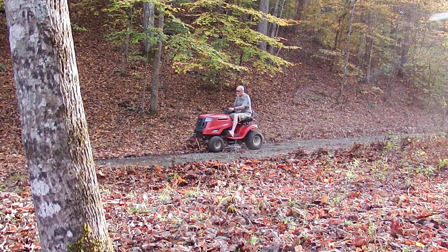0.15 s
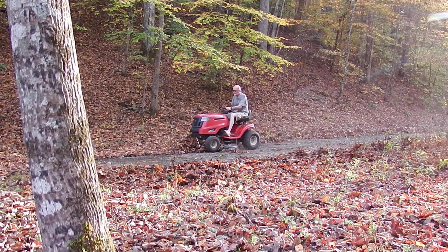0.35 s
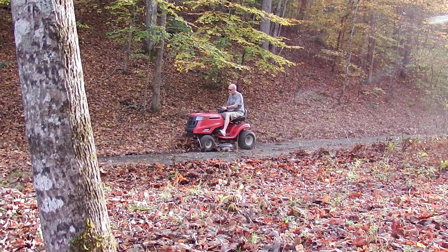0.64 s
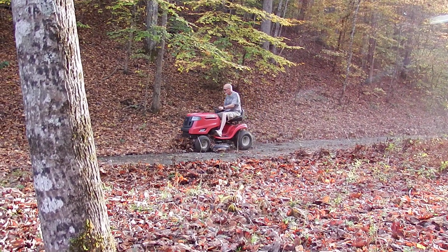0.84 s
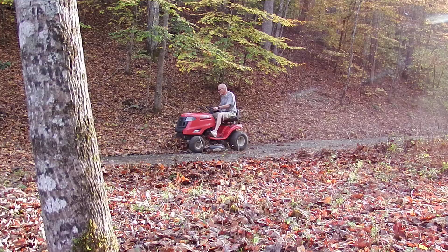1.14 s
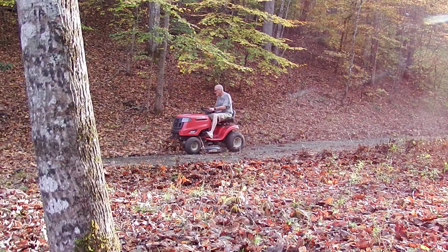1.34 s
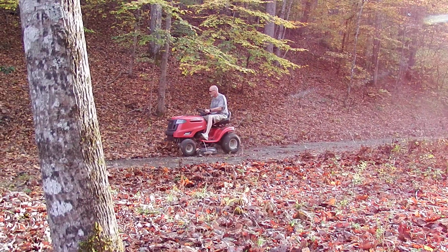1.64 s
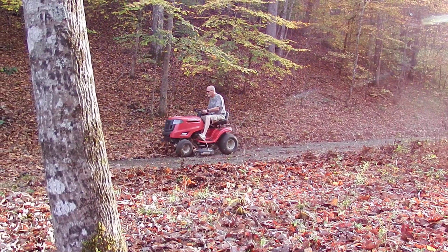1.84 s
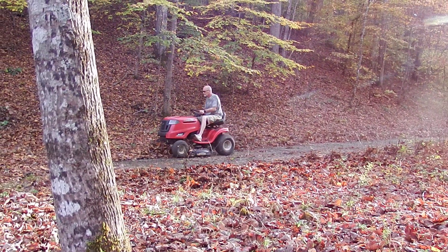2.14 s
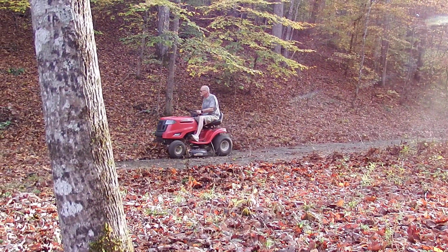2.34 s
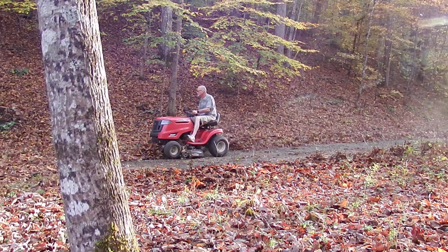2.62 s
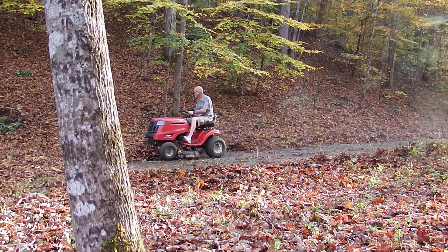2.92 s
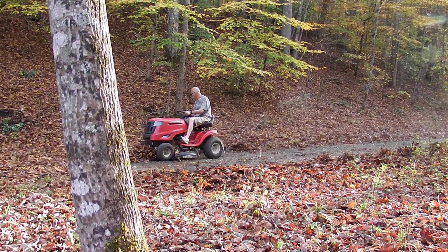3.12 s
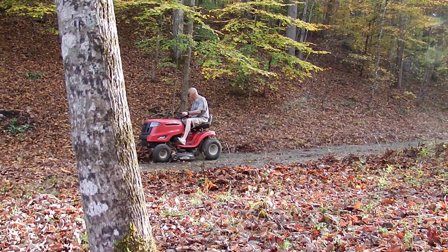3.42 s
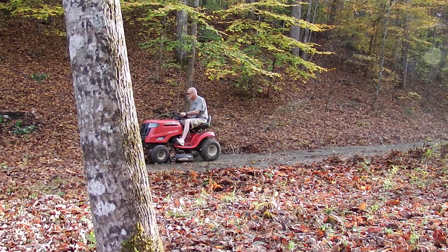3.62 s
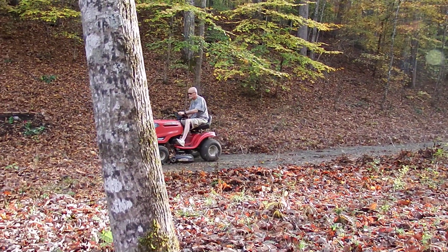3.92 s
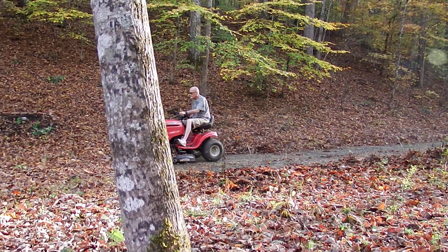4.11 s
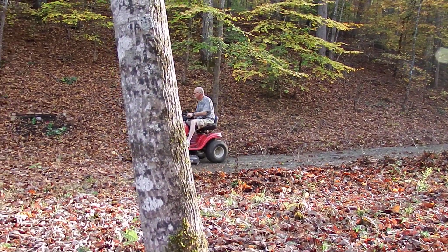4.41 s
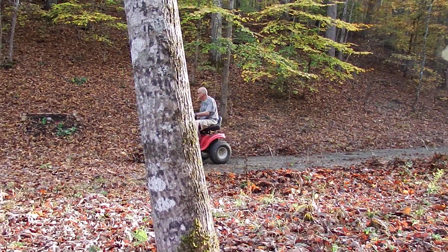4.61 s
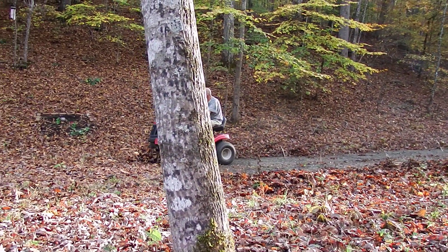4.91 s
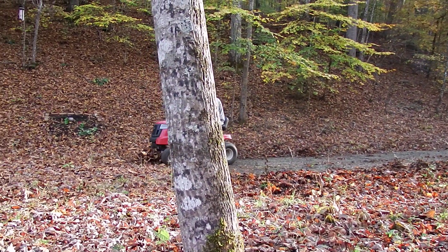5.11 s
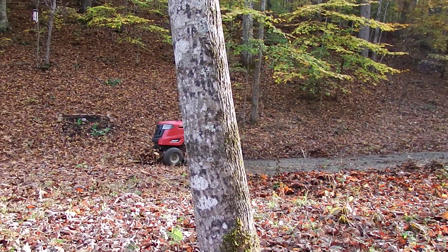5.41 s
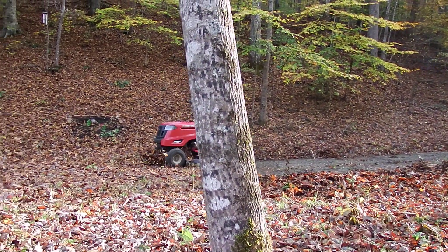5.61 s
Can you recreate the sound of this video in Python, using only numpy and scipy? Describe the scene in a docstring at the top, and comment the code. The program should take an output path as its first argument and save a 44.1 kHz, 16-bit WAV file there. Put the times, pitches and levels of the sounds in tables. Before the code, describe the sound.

Outdoors, a ride-on mower hums steadily while shredding dry fallen leaves in a bright, crackling rush, snapping twigs as it approaches.

```python
"""Riding mower mulching leaves

A riding mower mulches dry leaves on a woodland road, passing at some distance from a two-port microphone.
The engine runs up, then holds its speed but for a few sags; exhaust, blade hum and whine are fluttering tones.
Air under the deck is filtered noise; tearing leaves are clumped noise coloured by the steel deck and its chute.
The deck pings once and twigs crack as short noise bursts; the whole level dips briefly at two moments."""
import sys
import numpy as np
from scipy import signal
from scipy.fft import rfft, irfft, next_fast_len
from scipy.io import wavfile
from scipy.ndimage import uniform_filter1d, minimum_filter1d

SR = 44100
rng = np.random.default_rng(int(sys.argv[2]) if len(sys.argv) > 2 else 0)


def master(y):
    """Save y as 16-bit WAV."""
    cut = np.clip(np.atleast_2d(y).T, -1, 1)
    pcm = np.round(cut * 32767)  # scale
    wavfile.write(sys.argv[1], SR, pcm.astype(np.int16))


N = 253571
TIME = np.arange(N) / SR
PADDED = next_fast_len(N + SR // 10, True)
HZ = np.fft.rfftfreq(PADDED, 1 / SR)

# blade passes per second, before and after the run-up
START_HZ, GOVERNED_HZ = 84.7, 100.9
# the belt ties the engine's firings and the deck's whine to the blade passes
FIRINGS_PER_PASS, WHINE_PER_PASS = 0.2577, 6.085
# the mower is loudest when abreast, and 3 dB down PASSING_S before or after
ABREAST_S, PASSING_S = 5.2, 3.46
# everything on the mower grows louder with speed
RUN_UP_DB_PER_HZ = 0.21
# base levels at governed speed, abreast
DRONE_DB, RUSH_DB, HISS_DB, WHINE_DB = -51.5, -28, -18, -32
# beaming multiplies the distance curve in dB: the even drone changes less, the sideways whine more
DRONE_BEAMING, WHINE_BEAMING = 0.81, 2.36


def gain_of(db):
    """Decibels to amplitude."""
    return 10 ** (np.asarray(db) / 20)


def evened(x):
    """Scales to rms 1."""
    return x / np.sqrt(np.mean(x ** 2) + 1e-20)


def curves(rows):
    """The columns of a time table, joined by straight lines, one value a sample."""
    s, *columns = np.transpose(rows)
    return [np.interp(TIME, s, column) for column in columns]


def read(points):
    """A frequency table at every bin, interpolated over log frequency."""
    f, value = np.transpose(points)
    return np.interp(np.log(HZ + 1), np.log(f + 1), value)


def coloured(x, gain):
    """Filters by a gain at every bin."""
    return irfft(rfft(x, PADDED) * gain, PADDED)[:N]


def noise():
    """White noise."""
    return rng.standard_normal(N)


def wander(rate_hz):
    """Random drift of rms 1, mostly slower than the rate."""
    s = TIME[::32]
    hz = np.fft.rfftfreq(len(s), s[1])
    lowpass = np.exp(-(hz / rate_hz) ** 2) * (hz > 0)
    slow = irfft(rfft(rng.standard_normal(len(s))) * lowpass, len(s))
    return np.interp(TIME, s, evened(slow))


def arch(middle_s, length_s):
    """A smooth swell from 0 to 1 and back."""
    return np.cos(np.pi * np.clip((TIME - middle_s) / length_s, -0.5, 0.5)) ** 2


def below(edge_hz, order=16):
    """Share of the power that lies under an edge."""
    return 1 / (1 + (HZ / edge_hz) ** order)


def resonate(x, hz, width):
    """A resonance of gain 1 that follows the curve hz: shift down to zero, smooth, shift back."""
    turn = np.exp(2j * np.pi * np.cumsum(hz) / SR)
    r = np.exp(-np.pi * width / SR)
    return 2 * (turn * signal.lfilter([1 - r], [1, -r], x / turn)).real


def tone(turns, flutter, flutter_hz):
    """A line whose strength and phase flutter on the way through the wood."""
    angle = (2 * np.pi * ((turns + rng.random()) % 1)).astype("float32")
    in_phase = (1 + flutter * wander(flutter_hz)) * np.cos(angle)
    quadrature = flutter * wander(flutter_hz) * np.sin(angle)
    return evened(in_phase + quadrature)


def speed():
    """Blade passes per second: a smooth run-up, then steady but for sags under load."""
    # sags of the engine under load: (middle [s], length [s], loss [Hz])
    load_sags = [(1.55, 0.63, 2.13), (4.194, 0.46, 1.13), (4.72, 0.45, 0.71)]
    middle_s, scale_s = 0.55, 0.21
    run_up = 1 / (1 + np.exp((middle_s - TIME) / scale_s))
    sag_hz = sum(hz * arch(s, length) for s, length, hz in load_sags)
    return START_HZ + (GOVERNED_HZ - START_HZ) * run_up - sag_hz


def nearness_db():
    """The level follows the distance of a straight, steady pass."""
    return -10 * np.log10(1 + ((TIME - ABREAST_S) / PASSING_S) ** 2)


def mower_db():
    """The level shared by every part of the mower: nearer and faster is louder."""
    return nearness_db() + RUN_UP_DB_PER_HZ * (speed() - GOVERNED_HZ)


def engine(passes):
    """The muffled exhaust: multiples of the firing rate."""
    # exhaust lines: (multiple of the firing rate, level [dB])
    exhaust_lines = [(2, -36), (3, -27), (4, -8), (5, -3), (6, 0), (7, -8), (9, -2), (10, -4.5), (11, 2.5),
                     (12, 4), (14, 5.5), (15, 8.5), (18, 8.5)]
    drone = np.zeros(N)
    for k, db in exhaust_lines:
        drone += gain_of(db) * tone(k * passes * FIRINGS_PER_PASS, flutter=0.2, flutter_hz=13.0)
    return gain_of(DRONE_DB + (DRONE_BEAMING - 1) * nearness_db()) * drone


def blades(passes):
    """Harmonics of two blades that beat slowly, and a rougher whine that beats against the sixth."""
    # blade hum: (harmonic, base level [dB], second blade against the first [dB],
    #             multiple of the distance curve, extra growth with speed [dB/Hz])
    hum_harmonics = [(1, -54, -9, .8, 1.3), (2, -40.3, -6, 1.9, .2), (3, -37, -14, .3, .55),
                     (4, -38.2, -7, 1.8, 0), (5, -43.5, -16, .6, .25)]
    # single harmonics swell or fade for a moment: (harmonic, middle [s], length [s], lift [dB])
    harmonic_swells = [(1, 1.4, .7, -10), (1, 2.42, 1.0, 3), (1, 3.8, 0.56, -3), (2, 1.21, 0.44, 5),
                       (2, 1.54, 0.4, -7), (2, 2.21, 0.5, -4), (3, .25, .25, 12.5), (3, 1.21, .6, 3),
                       (3, 1.7, 0.97, -12), (3, 4.34, 1, -3), (4, 2.175, 0.42, 14), (4, 4.55, 0.35, 8)]
    # the whine swells or fades briefly: (middle [s], length [s], lift [dB])
    whine_lifts = [(1.38, 1, 2.5), (4.11, 0.35, 5), (4.6, 0.2, 8), (4.88, 0.14, 12), (5.52, .25, -8)]
    # one blade slips behind the other on the belt, so their hums beat
    slip_hz, in_step_s = 0.444, 3.024
    lag = 2 * np.pi * slip_hz * (TIME - in_step_s)
    near_db = nearness_db()
    slow_hz = GOVERNED_HZ - speed()
    hum = np.zeros(N)
    for k, db, second_db, beaming, growth in hum_harmonics:
        beat = abs(1 + gain_of(second_db) * np.exp(1j * k * lag))
        swell_db = sum(lift * arch(s, length) for which, s, length, lift in harmonic_swells
                       if round(which) == round(k))
        level_db = db + swell_db + (beaming - 1) * near_db - growth * slow_hz
        hum += gain_of(level_db) * beat * tone(k * passes, flutter=0.083 * k, flutter_hz=5.9)

    swell_db = sum(db * arch(s, length) for s, length, db in whine_lifts)
    whine_db = WHINE_DB + (WHINE_BEAMING - 1) * near_db + swell_db
    sixth_db = -5  # the sixth harmonic against the whine just above it
    sixth = gain_of(sixth_db) * tone(6 * passes, flutter=0.26, flutter_hz=8.8)
    whine = tone(WHINE_PER_PASS * passes, flutter=0.61, flutter_hz=22)
    return hum + gain_of(whine_db) * (sixth + whine)


def air():
    """The turbulent rush under the deck: noise shaped by a fixed spectrum."""
    # air stirred by the blades: (frequency [Hz], relative level [dB per Hz])
    air_spectrum = [(25, -44), (70, -42), (115, -31), (165, -15), (250, -2.5), (380, -3.5), (540, 1),
                    (680, -3.5), (930, -1), (1150, -10.5), (1500, -8), (3000, -58)]
    return gain_of(RUSH_DB) * evened(coloured(noise(), gain_of(read(air_spectrum))))


def deck_colour():
    """The spectrum of tearing leaves, lifted or lowered at each resonance of the steel deck."""
    # leaves being shredded, without the deck: (frequency [Hz], relative level [dB per Hz])
    leaf_spectrum = [(600, -55), (1000, -22.5), (1220, -6), (1700, -6.5), (2300, -3.5), (3100, -5.5),
                     (3900, -3), (4400, -8.5), (5100, -20.5), (5600, -28.5), (6400, -35), (8500, -23.5),
                     (10300, -34), (12500, -40.5), (15700, -56)]
    # resonances of the steel deck: (frequency [Hz], width [Hz], lift [dB])
    deck_modes = [(1177, 67, 3), (1500, 87, 2.5), (1747, 79, 2.5), (1928, 74, 5), (2212, 61, 2.5),
                  (2820, 70, 1), (3310, 100, 3.5), (3538, 70, 5.5), (3800, 89, 2.5), (4100, 79, 5),
                  (4610, 82, -1)]
    lift_db = sum(db / (1 + (2 * (HZ - hz) / width) ** 2) for hz, width, db in deck_modes)
    return gain_of(read(leaf_spectrum) + lift_db)


def shreds(per_s, spread_db):
    """A train of tiny snaps, a few of them much larger than the rest."""
    size = gain_of(spread_db * np.minimum(rng.exponential(1, N), 5))
    return evened(size * rng.choice([-1, 1], N) * (rng.random(N) < per_s / SR))


def crackle(per_s, spread_db, ring_s):
    """Stems break at random: each gives a brief flare, returned as a power of mean 1."""
    size = gain_of(spread_db * np.minimum(rng.exponential(1, N), 3)) * (rng.random(N) < per_s / SR)
    flares = signal.lfilter([1], [1, -np.exp(-1 / (ring_s * SR))], size ** 2)
    return flares / flares.mean()


def chute(x, hz, lift_db, width):
    """The discharge gathers hiss into a moving resonance; a gain partly offsets the lift."""
    return (x + (gain_of(lift_db) - 1) * resonate(x, hz, width)) / gain_of(0.47 * lift_db)


def bounced(x):
    """Short echoes comb the hiss with ripples that slide slowly."""
    # bounces off the road and the bank, shifting as the mower moves:
    # (first delay [s], last delay [s], level [dB])
    echo_paths = [(0.0045, 0.00382, -21), (0.00225, 0.00313, -28), (.0066, .0058, -25),
                  (.0092, .0104, -20.5)]
    echoes = np.zeros(N)
    for first, last, db in echo_paths:
        delay_s = np.linspace(first, last, N)
        echoes += gain_of(db) * np.interp(TIME - delay_s, TIME, x, left=0)
    return x + echoes


def leaves(passes, uneven_db=0.31, uneven_hz=9):
    """Leaves tear in clumps at each blade pass; the deck and its chute colour the hiss."""
    # thicker drifts pass through the deck: (middle [s], length [s], hiss lift [dB], treble lift [dB])
    leaf_drifts = [(0.266, .16, 2, 2.5), (0.837, 1, 4.5, 1.5), (1.42, 0.73, 2.5, 1.5), (1.71, .25, 4, 6),
                   (2.24, 0.76, 1.5, .5), (2.85, 0.77, 2, 2.5), (3.48, 0.096, 1.5, 4.5),
                   (4.47, .33, 3.5, 2), (5.13, 0.92, 2, 0.5)]
    # treble before the drifts, dulling as the mower draws abreast and goes behind a trunk:
    # (time [s], bright hiss [dB], fizz [dB])
    treble_levels = [(0, -23, -41.5), (.55, -22, -42.5), (1.5, -17.5, -40), (1.95, -19.5, -43.5),
                     (2.5, -20, -44), (3.1, -24, -41.5), (3.9, -23.5, -42), (4.7, -24, -48.5),
                     (5.75, -24.5, -48.5)]
    # two bands of the discharge, shifting as the mower drives by:
    # (time [s], lower band [Hz], its lift [dB], upper band [Hz], its lift [dB])
    chute_bands = [(0, 2250, 3, 3630, -4), (1.5, 2460, 7.5, 3720, 7.5), (2.4, 2359, 3, 3666, 9),
                   (3.2, 2330, 4, 3780, 2.5), (3.9, 2160, -0.5, 3740, 2), (4.5, 2070, 7, 3800, 4.5),
                   (5.75, 2280, 6, 3850, 3.5)]
    feed_db = uneven_db * wander(uneven_hz)
    hiss_db = HISS_DB + feed_db + sum(db * arch(s, length) for s, length, db, _ in leaf_drifts)
    crisp_db = feed_db + sum(db * arch(s, length) for s, length, _, db in leaf_drifts)
    bright_db, fizz_db = curves(treble_levels) + crisp_db
    lower_hz, lower_db, upper_hz, upper_db = curves(chute_bands)

    clumps = gain_of(0.58 * wander(31) + 0.23 * wander(320) + 0.18 * np.cos(2 * np.pi * passes))
    stems = crackle(per_s=45, spread_db=6, ring_s=0.0076)
    tearing = clumps * (noise() + 0.42 * shreds(per_s=3000, spread_db=3.0))

    # three bands; the stems stand out most in the highest
    colour, low, high = deck_colour(), below(2730), 1 - below(6200)
    hiss = coloured(tearing * np.sqrt(1 + 0.018 * stems), colour * np.sqrt(low))
    bright = coloured(tearing * np.sqrt(1 + 0.1 * stems), colour * np.sqrt((1 - low) * (1 - high)))
    fizz = coloured(tearing * np.sqrt(1 + 0.62 * stems), colour * np.sqrt(high))
    hiss = bounced(chute(hiss, lower_hz, lower_db, width=320))
    bright = bounced(chute(bright, upper_hz, upper_db, width=130))
    return gain_of(hiss_db) * evened(hiss) + gain_of(bright_db) * evened(bright) + gain_of(fizz_db) * evened(fizz)


def ping(start_s=0.273, rise_s=0.0021):
    """Something hard rings one mode of the deck, quickly damped by the leaves."""
    # the struck mode: frequency [Hz], level [dB], time to fall 60 dB [s]
    hz, db, t60 = (1920, -6, .04)
    age = np.maximum(TIME - start_s, 0)
    return gain_of(db - 60 * age / t60) * (1 - np.exp(-age / rise_s)) * np.sin(2 * np.pi * hz * age)


def twigs(t60_s=0.051, rise_s=0.0019, snap_tilt_db_per_khz=-0.4):
    """Each twig splinters on the blades in a short burst: a crunch in the deck and a snap above it."""
    # twigs hitting the blades: (time [s], crunch [dB], treble snap [dB])
    twig_hits = [(0.3, -13, -36), (0.316, -8.5, -28.5), (.433, -12, -31), (.727, -19, -34),
                 (1.165, -24, -34), (1.29, -9, -29), (1.315, -21, -35), (1.348, -17, -29),
                 (1.419, -21, -32), (1.611, -14, -42), (1.626, -6.5, -30), (1.644, -10, -34),
                 (3.451, -12, -33), (3.477, -8.5, -28.5), (3.504, -10.5, -29), (3.881, -14, -23),
                 (3.934, -6, -23), (4.059, -13, -27), (4.372, -11.5, -30), (4.655, -9.5, -37),
                 (5.182, -27, -29), (5.266, -16, -28), (5.478, -11.5, -26.5), (5.695, -8, -29)]
    crunch, snap = np.zeros((2, N))
    for s, crunch_db, snap_db in twig_hits:
        span = slice(int(s * SR), int(s * SR) + SR // 5)
        age = np.maximum(TIME[span] - s, 0)
        fade = gain_of(-60 * age / t60_s)
        crunch[span] += gain_of(crunch_db) * fade * (1 - np.exp(-age / rise_s))  # the deck takes a moment to ring up
        snap[span] += gain_of(snap_db) * fade
    colour, low = deck_colour(), below(5100)
    body = colour * np.sqrt(low) * HZ ** 0.4
    treble = colour * np.sqrt(1 - low) * gain_of(snap_tilt_db_per_khz * HZ / 1000)
    return crunch * evened(coloured(noise(), body)) + snap * evened(coloured(noise(), treble))


def dips():
    """The level falls quickly at each dip and creeps back."""
    # (time [s], depth [dB]); a negative depth is a lift held from the start, fading after its time
    level_dips = [(.32, -2.5), (1.638, 9.5), (3.48, 2.5), (3.94, 0)]
    fall_db_per_s, recovery_s, linger = 138, 0.47, 1.29
    down_db = np.zeros(N)
    for s, depth_db in level_dips:
        age = np.maximum(TIME - s, 0)
        recovering_s = np.maximum(age - depth_db / fall_db_per_s, 0)
        remaining = np.exp(-(recovering_s / recovery_s) ** linger)
        down_db += np.minimum(fall_db_per_s * age, depth_db) * remaining
    return gain_of(-down_db)


def ports(x, scatter_s=0.03):
    """Two close microphone ports hear nearly the same sound; they part in the treble."""
    # (frequency [Hz], share not in common [dB], left minus right [dB], phase by which left leads [rad])
    port_response = [(30, -16, .3, 0), (90, -23, 1.5, -0.099), (280, -31, 1, 0.052), (420, -28, 1, 0.034),
                     (766, -50, 0, 0), (1650, -51, 0, 0), (2030, -32, -0.1, -0.15),
                     (2400, -44, -0.3, 0.043), (2700, -26, 1.6, -0.19), (3050, -24, -.8, -0.42),
                     (3400, -22, -2.5, -0.1), (4050, -38, 0, -0.044), (5000, -28, -0.5, 0.026),
                     (5500, -2.5, -6.5, -1.44), (6800, -4, -4, -0.28), (7740, -13, .9, -0.096),
                     (9100, -20, -1, -.32), (10200, -4.5, -3, 0.69), (11500, -14, 1.5, -.03),
                     (15000, -23, 0, 0)]
    apart_db, balance_db, phase = (read([(row[0], row[k]) for row in port_response]) for k in (1, 2, 3))
    apart = np.minimum(gain_of(apart_db), np.sqrt(0.5))
    # smears time, keeps the spectrum
    diffuse = np.exp(1j * np.angle(rfft(noise() * np.exp(-TIME / scatter_s), PADDED)))
    direct, scattered = np.sqrt(1 - apart ** 2), apart * diffuse
    lean = gain_of(balance_db / 2) * np.exp(0.5j * phase)
    left = coloured(x, direct * lean + scattered)
    right = coloured(x, direct / lean - scattered)
    return np.array([left, right])


def limited(x, ceiling_db=-2, size=45):
    """A fast limiter, shared by both channels, holds the peaks under a ceiling."""
    room = np.minimum(1, gain_of(ceiling_db) / (abs(x).max(0) + 1e-9))
    return x * uniform_filter1d(minimum_filter1d(room, size), size)


def scene():
    """The belt ties the blades to the engine, so one speed drives every turning part."""
    passes = np.cumsum(speed()) / SR
    mower = gain_of(mower_db()) * (engine(passes) + blades(passes) + air() + leaves(passes))
    return ports(dips() * (mower + ping() + twigs()))


def record(dry):
    """The microphone's narrow dips, the peak limiter, then the band limit."""
    # narrow dips in the microphone's response: (frequency [Hz], width [Hz])
    response_dips = [(223, 53), (1100, 109)]
    for hz, width in response_dips:
        dry = signal.lfilter(*signal.iirnotch(hz, hz / width, SR), dry)
    edge_hz = 15780
    lowpass = signal.firwin(511, edge_hz, window=("kaiser", 9), fs=SR)
    return signal.oaconvolve(limited(dry), lowpass[None], "same")


dry = scene()
out = record(dry)
master(out)
```